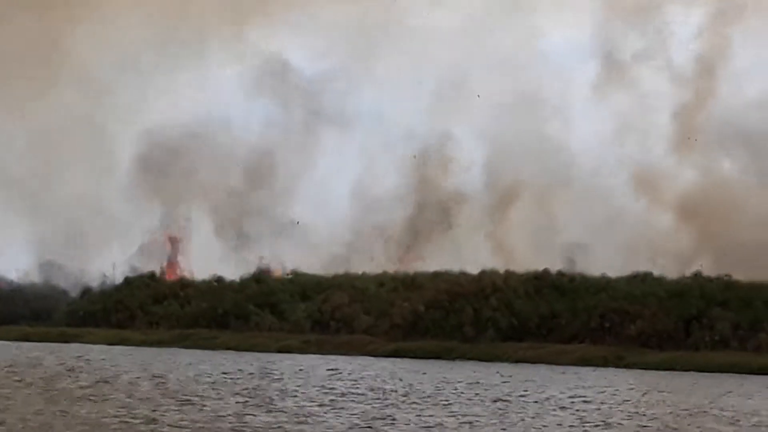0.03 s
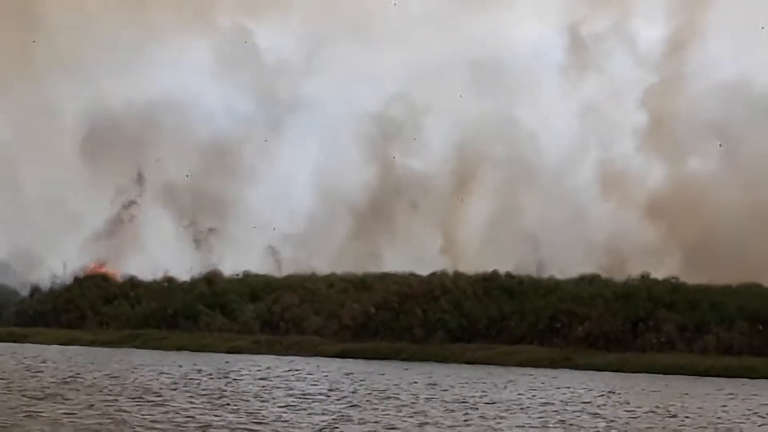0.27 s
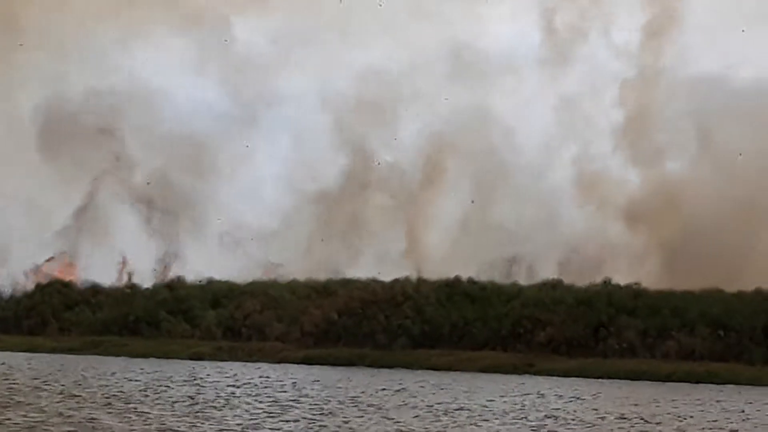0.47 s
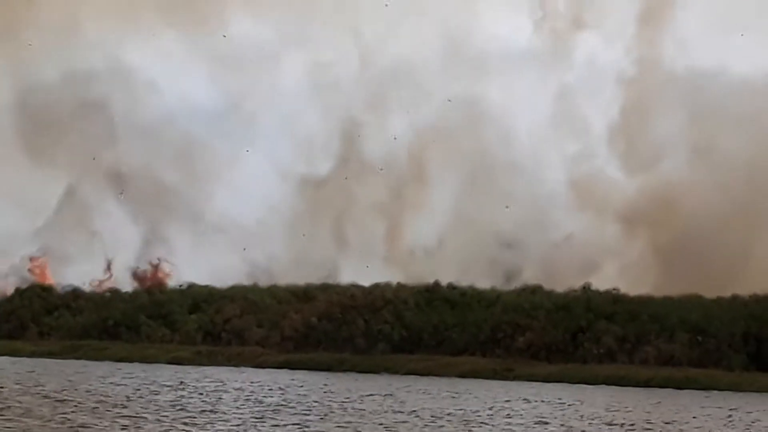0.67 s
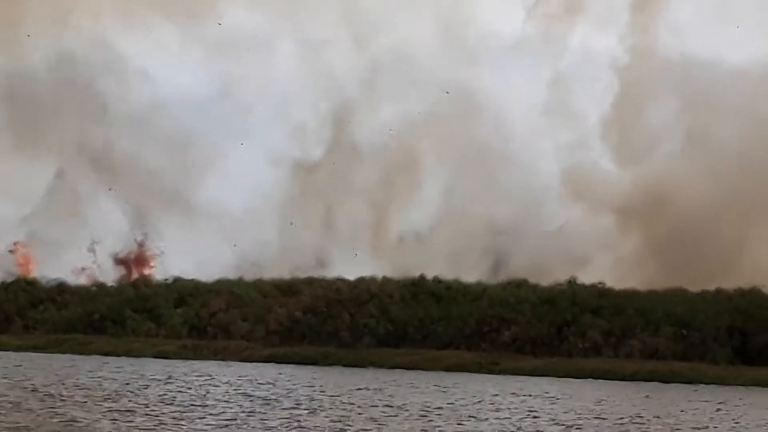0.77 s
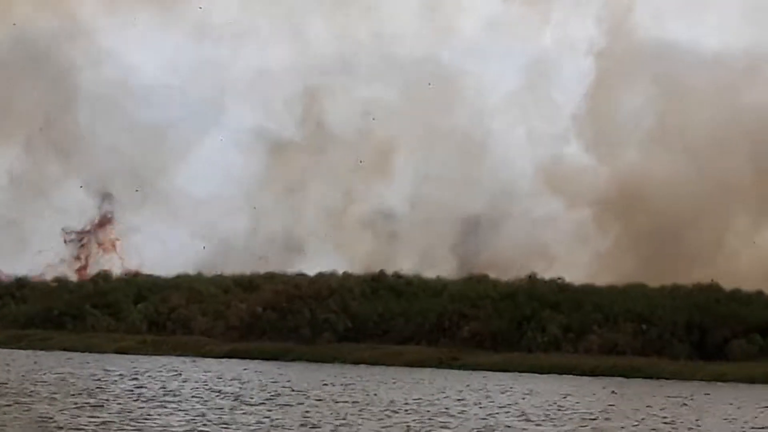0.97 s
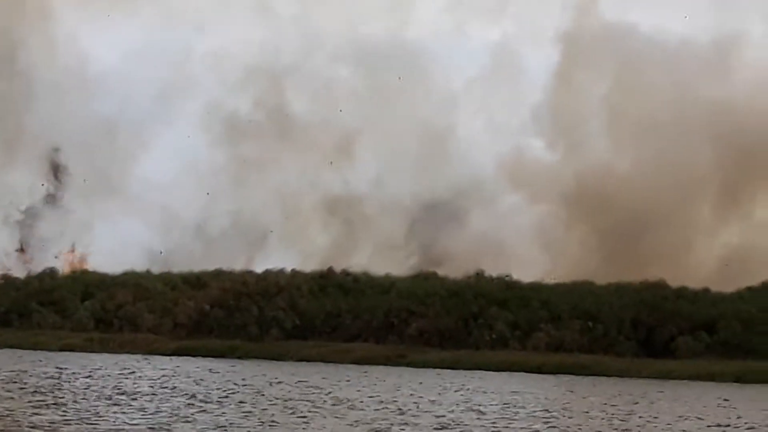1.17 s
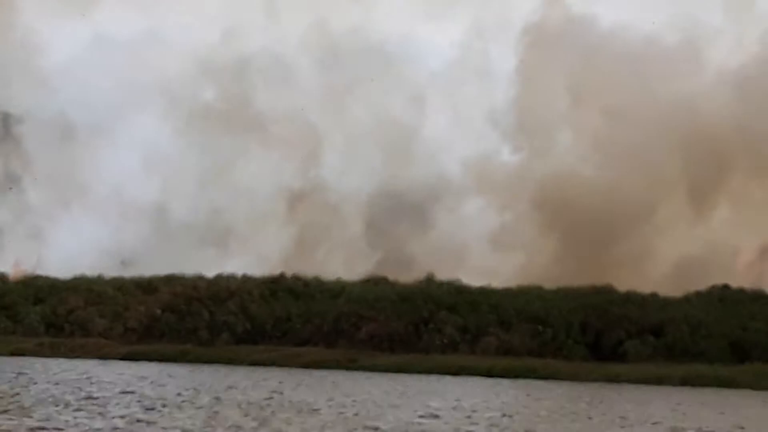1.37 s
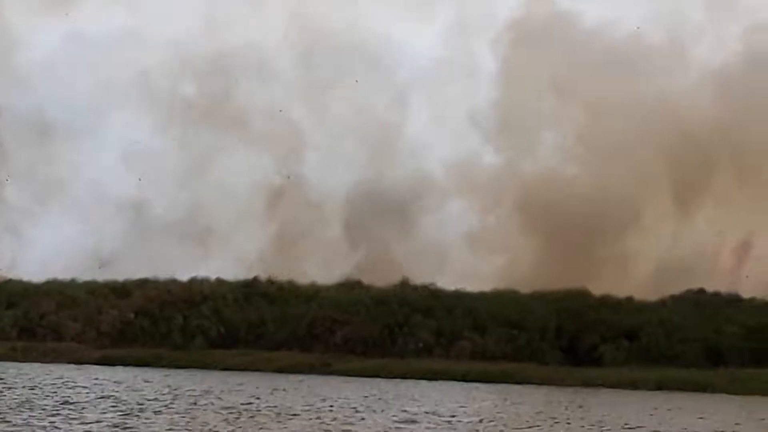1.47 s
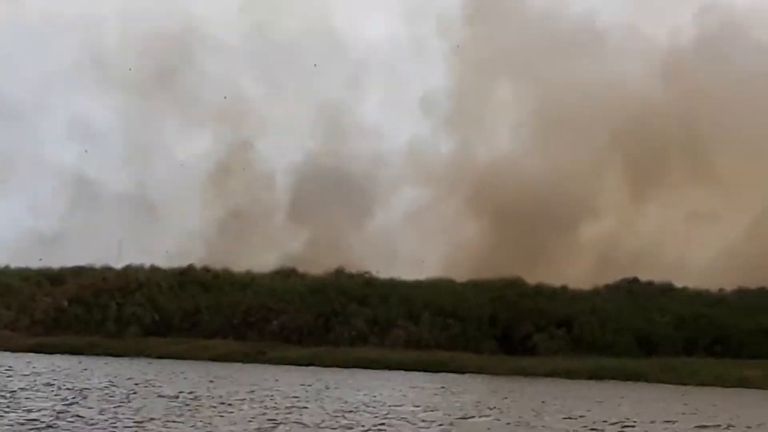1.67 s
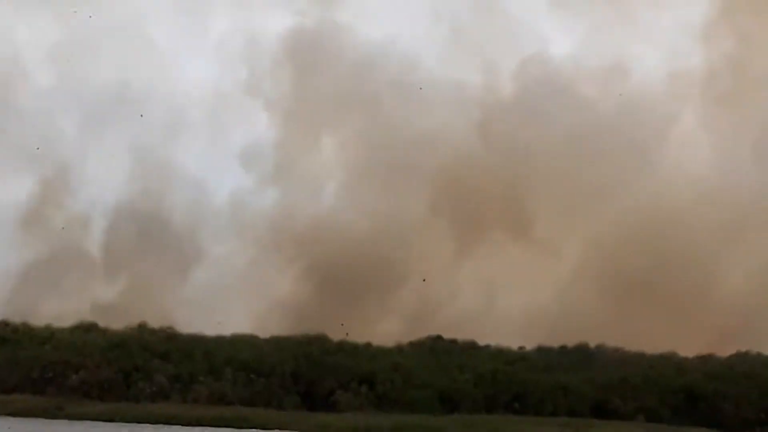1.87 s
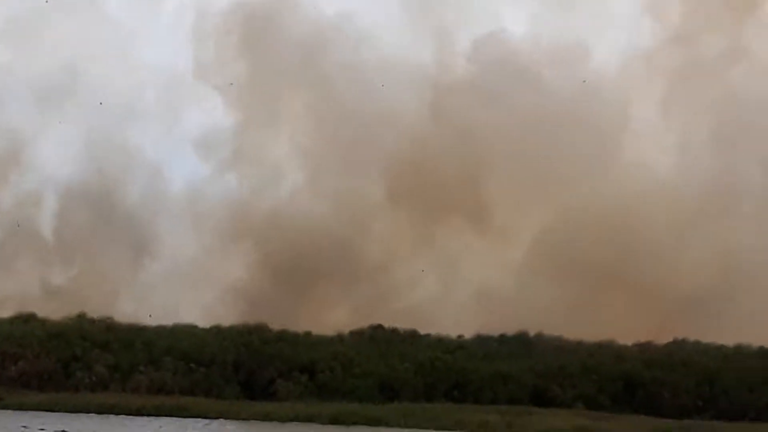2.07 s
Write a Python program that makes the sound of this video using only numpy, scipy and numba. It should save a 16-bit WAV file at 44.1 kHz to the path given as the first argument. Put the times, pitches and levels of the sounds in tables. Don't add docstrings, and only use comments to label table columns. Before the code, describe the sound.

Close, distorted wind rumble and ragged popping gusts dominate an outdoor handheld microphone by a river; a dull, continuous distant blaze lies far underneath, with a tiny handling rustle late before the gusts ease.

```python
import sys
import numpy as np
from scipy import signal
from scipy.fft import rfft, irfft
from scipy.io import wavfile
from scipy.ndimage import uniform_filter1d, minimum_filter1d
from numba import njit

SR = 44100
rng = np.random.default_rng(int(sys.argv[2]) if len(sys.argv) > 2 else 0)


def volts_from_decibels(level):
    exponent = np.asarray(level, float) / 20
    return 10 ** exponent


def log_audio(samples):
    frames = np.atleast_2d(samples).T
    limited = np.clip(frames, -1, 1)
    pcm = np.round(limited * 32767).astype(np.int16)
    wavfile.write(sys.argv[1], SR, pcm)


N = 93051


def unit(x):
    return x / np.sqrt(np.mean(x ** 2))


def curve(rows):
    return np.interp(np.arange(N) / SR, *np.array(rows).T)


def walk(rate_hz):
    hold = int(SR / rate_hz)
    levels = np.repeat(rng.standard_normal(N // hold + 1), hold)
    return unit(uniform_filter1d(uniform_filter1d(levels, hold), hold)[:N])


@njit
def svf(x, hz, damping):
    out = np.empty((3, len(x)))
    g = np.tan(np.pi * hz / SR)
    band_state, low_state = 0., 0.
    for i in range(len(x)):
        band = (band_state + g * (x[i] - low_state)) / (1 + g * (g + damping))
        low = low_state + g * band
        out[0, i] = low
        out[1, i] = damping * band
        out[2, i] = x[i] - damping * band - low
        band_state = 2 * band - band_state
        low_state = 2 * low - low_state
    return out


def wind():
    bass_cut_hz, ceiling, port_hz = 128.7, 1.47, 3000.
    push = svf(eddies() + snaps(), bass_cut_hz, 1.414)[2]
    push = ceiling * np.tanh(push / ceiling)
    return svf(svf(push, port_hz, 1.63)[0], port_hz, 1.63)[0]


def eddies():
    per_s, scatter_db, width_spread = 550, 1.6, 0.948
    power, eddy_ms = gusts()
    gap, sign, size, spread = rng.random((N // 20, 4)).T
    at = np.cumsum(gap + 0.2) / 0.7 * SR / per_s
    at = at[at < N - 1]
    n, here = len(at), at.astype(int)
    width_s = eddy_ms[here] / 1000 * np.exp(width_spread * (spread[:n] - 0.5))
    height = np.sign(sign[:n] - 0.5) * unit(volts_from_decibels(-scatter_db * np.log(1 - size[:n])))
    height = height * np.sqrt(power[here] / (per_s * width_s * np.pi / 2))
    return bumps(at, width_s * SR, height, 25.)


# columns centre_s [s], level_db [dB], eddy_ms [ms], length_s [s]
GUSTS = [(0.042, -18.5, 1, 0.041), (0.142, -15.5, 0.48, 0.041), (0.238, -6.5, 0.29, 0.034),
         (0.287, -14, 0.61, 0.024), (0.334, -12.5, 0.44, 0.035), (0.37, -11.5, 0.29, 0.046),
         (0.475, -11.5, 0.36, 0.021), (0.52, -13.5, 0.28, 0.027), (0.598, -20.5, 0.31, 0.029),
         (0.684, -16, 0.43, 0.026), (0.744, -16.0, 0.29, 0.025), (0.804, -17.5, 0.28, 0.048),
         (0.939, -16.5, 0.13, 0.057), (0.991, -18, 0.16, 0.024), (1.075, -10, 0.85, 0.012),
         (1.118, -17.5, 0.79, 0.02), (1.185, -15, 0.38, 0.035), (1.22, -12.5, 0.58, 0.031),
         (1.277, -10.5, 0.51, 0.015), (1.328, -22.0, 0.26, 0.016), (1.358, -14, 0.16, 0.016),
         (1.393, -19.5, 0.37, 0.059), (1.449, -10, 0.26, 0.039), (1.502, -18, 0.41, 0.063),
         (1.587, -14.5, 0.15, 0.046), (1.692, -15.5, 0.56, 0.03), (1.744, -15.5, 0.57, 0.026),
         (1.841, -22, 0.95, 0.026), (1.878, -60, 0.49, 0.042)]
# columns centre_s [s], level_db [dB], eddy_ms [ms], length_s [s]
MORE_GUSTS = [(.013, -18, 1, 0.024), (.116, -13.5, 0.55, 0.019), (.172, -21, 0.54, 0.025), (.205, -23, 1, .02),
              (.395, -16.5, 0.28, 0.03), (.42, -13.5, 0.3, 0.042), (.445, -20.5, 0.37, 0.058),
              (.497, -13, 0.66, .02), (.545, -16, 0.39, 0.033), (.572, -17, 0.51, 0.014),
              (.625, -22.5, 0.42, .025), (.66, -20.5, 0.38, 0.037), (.78, -15.5, 0.43, 0.026),
              (.83, -18, 0.52, .025), (.858, -25.5, 0.43, 0.02), (.91, -22.5, 0.45, 0.032),
              (1.022, -32, 0.49, 0.034), (1.15, -13.5, 1, 0.035), (1.3, -18.5, 0.36, 0.022),
              (1.43, -14, 0.23, 0.014), (1.541, -21, 0.92, 0.033), (1.606, -15.5, 0.2, 0.044),
              (1.645, -20, 0.3, .02), (1.72, -16, 0.65, 0.024), (1.775, -21.5, 0.69, .03),
              (1.923, -17.5, 1, 0.016), (1.96, -28.5, 0.73, 0.053), (1.991, -13.5, 1, .037),
              (2.027, -18.5, 0.51, 0.028), (2.081, -29.5, 0.94, 0.12)]
# columns time_s [s], level_db [dB]
BREEZE = [
    (0, -25),
    (.1, -23),
    (.35, -13),
    (.7, -27.5),
    (.9, -14.5),
    (1.1, -19),
    (1.4, -18),
    (1.7, -24),
    (1.9, -28.5),
    (2.11, -36.5),
]


def gusts():
    gust_gain_db, breeze_eddy_ms, eddy_scale, narrowest_ms, flutter_db = 4, 1, 1.031, 0.26, 2.5
    t = np.arange(N) / SR
    power = volts_from_decibels(curve(BREEZE) + flutter_db * walk(30.09)) ** 2
    log_width = power * np.log(breeze_eddy_ms)
    for centre_s, level_db, eddy_ms, length_s in list(GUSTS) + list(MORE_GUSTS):
        shape = np.exp(-12 * np.abs((t - centre_s) / length_s) ** 2.735)
        gust = volts_from_decibels(level_db + gust_gain_db) ** 2 * shape
        core_ms = max(eddy_ms * eddy_scale, narrowest_ms)
        gust_log = np.log(breeze_eddy_ms) + np.log(core_ms / breeze_eddy_ms) * shape ** 0.5
        power = power + gust
        log_width = log_width + gust * gust_log
    return power, np.exp(log_width / power)


# columns start_s [s], peak_db [dB], eddy_ms [ms]
SNAPS = [(0.111, -23.5, 0.2), (0.141, -16.5, 0.21), (0.231, -11, 0.23), (0.235, -5, 0.2), (0.243, -7, 0.2),
         (0.321, -18, 0.22), (0.372, -7.5, 0.19), (0.383, -19, 0.21), (0.414, -11, 0.18),
         (0.472, -4.5, 0.23), (0.517, -16.5, 0.19), (0.596, -16, 0.21), (0.653, -18, 0.22),
         (0.736, -12.5, 0.21), (0.774, -12.5, 0.21), (0.805, -13, 0.22), (0.938, -17.5, 0.24),
         (0.987, -15.5, 0.23), (1.169, -18, 0.18), (1.215, -17, 0.25), (1.273, -25, 0.17),
         (1.355, -9, 0.22), (1.423, -5, 0.25), (1.437, -11, 0.18), (1.448, -6, 0.19), (1.5, -10, 0.21),
         (1.572, -10, 0.26), (1.583, -12, 0.19), (1.6, -10, 0.16), (2.023, -19, 0.18)]


def snaps():
    late_s, spacing_widths, gain_db, fade_db = 0.001, 5.5, 2.5, 3.
    start_s, peak_db, eddy_ms = np.array(SNAPS).T
    turn = np.arange(3)[:, None]
    width_s = eddy_ms / 1000 + 0 * turn
    at_s = start_s + late_s + turn * spacing_widths * width_s
    height = volts_from_decibels(peak_db + gain_db - fade_db * np.abs(turn - 1)) * (-1.) ** turn
    return bumps(at_s.ravel() * SR, width_s.ravel() * SR, height.ravel(), 25.)


@njit
def bumps(at, width, height, reach):
    out = np.zeros(N)
    for e in range(len(at)):
        span = reach * width[e]
        for i in range(max(int(at[e] - span) + 1, 0), min(int(at[e] + span), N)):
            u = (i - at[e]) / width[e]
            out[i] += height[e] / (1 + u * u) * (1 - (u / reach) ** 2) ** 2
    return out


# columns start_s [s], length_s [s], centre_hz [Hz], width_hz [Hz], level_db [dB]
RUSTLES = [
    (0.0, 0.058, 12840, 7000, -73.5),
    (0.0, .08, 7450, 3000, -69),
    (1.712, .02, 8100, 1300, -63),
    (1.717, 0.014, 12870, 4500, -72),
    (1.753, .04, 8200, 2200, -78),
]


def rustles():
    t, out = np.arange(N) / SR, 0
    for start_s, length_s, centre_hz, width_hz, level_db in RUSTLES:
        damping = width_hz / centre_hz
        rub = svf(rng.standard_normal(N), centre_hz, damping)[1]
        rub = svf(rub, centre_hz, damping)[1]
        attack = np.clip((t - start_s) / 0.003 + 1, 0, 1)
        decay = np.exp(-(np.clip(t - start_s, 0, 1) / length_s) ** 3)
        out = out + volts_from_decibels(level_db) * unit(rub) * attack * decay
    return out


# columns time_s [s], level_db [dB]
BLAZE = [(0, -45), (.25, -45.5), (.45, -45), (.65, -45), (.8, -45.5), (1.05, -46), (1.2, -44.5),
         (1.43, -43), (1.65, -45.5), (1.76, -45.5), (1.88, -48.5), (2.11, -47.5)]
# columns pitch_hz [Hz], level_db [dB per Hz]
FIRE = [
    (400, -10.5),
    (1100, -5.5),
    (2000, -2.5),
    (3400, -11.5),
    (5200, -22),
    (6800, -36.5),
    (8600, -36.5),
    (9200, -56),
]


def fire():
    crackles_per_s, scatter_db, roar_db, flicker_db = 1400, 2.4, 2.6, 0.8
    crackle = clicks(crackles_per_s, scatter_db) * volts_from_decibels(2 * walk(20))
    roar = volts_from_decibels(roar_db) * rng.standard_normal(N)
    blaze = colour(crackle + roar, FIRE)
    return unit(blaze) * volts_from_decibels(curve(BLAZE) + flicker_db * walk(9.25))


def clicks(per_s, scatter_db):
    hit = rng.random(N) < per_s / SR
    sign = np.sign(rng.standard_normal(N))
    size = np.minimum(rng.exponential(size=N), 3)
    return unit(hit * sign * volts_from_decibels(scatter_db * size))


def colour(x, points):
    size = 2048
    hz, db = np.array(points).T
    grid_hz = np.fft.rfftfreq(size, 1 / SR) + 1
    cepstrum = irfft(np.log(volts_from_decibels(np.interp(np.log(grid_hz), np.log(hz), db))))
    cepstrum[1:size // 2] *= 2
    cepstrum[size // 2 + 1:] = 0
    return signal.fftconvolve(x, irfft(np.exp(rfft(cepstrum))))[:N]


def scene():
    return (wind() + rustles() + fire())[None, :]


def low_pass(x):
    return signal.sosfilt(signal.butter(12, 15720, fs=SR, output="sos"), x)


def record(dry):
    sub_cut_hz, hiss_db, limit = 45., -90, 0.98
    x = svf(dry[0], sub_cut_hz, 1.26)[2] + volts_from_decibels(hiss_db) * rng.standard_normal(N)
    gain = 1 / np.maximum(np.abs(x) / limit, 1)
    gain = minimum_filter1d(gain, size=241)
    gain = uniform_filter1d(uniform_filter1d(gain, size=120), size=120)
    mix = (x * gain)[None, :]
    return low_pass(mix)


dry = scene()
out = record(dry)
log_audio(out)
```